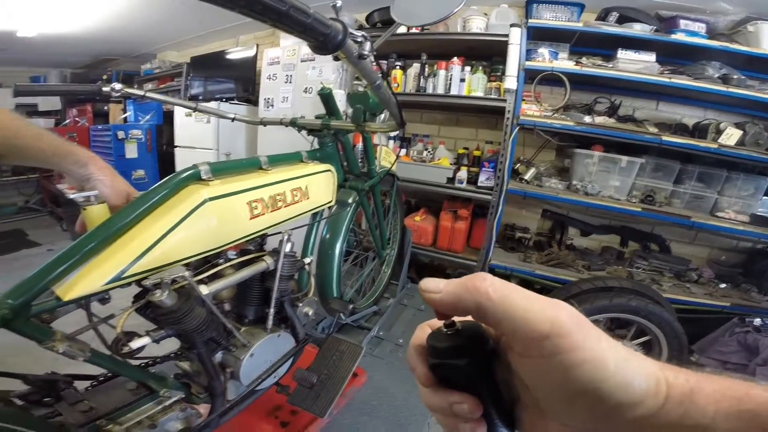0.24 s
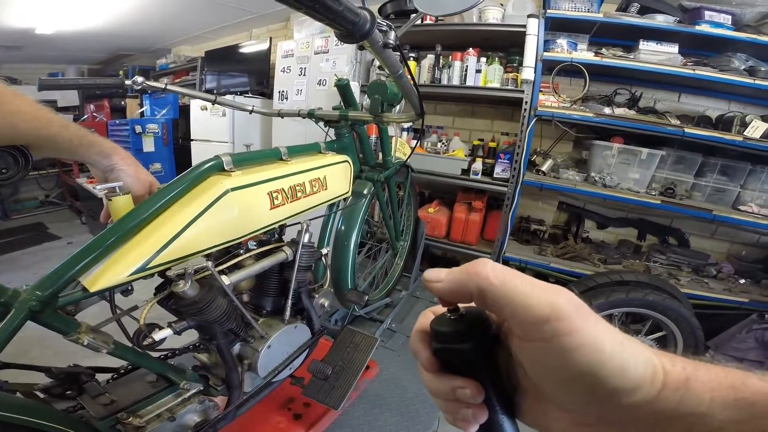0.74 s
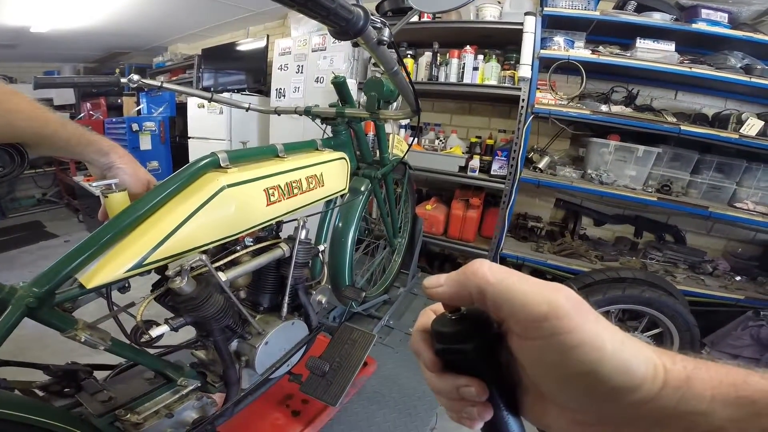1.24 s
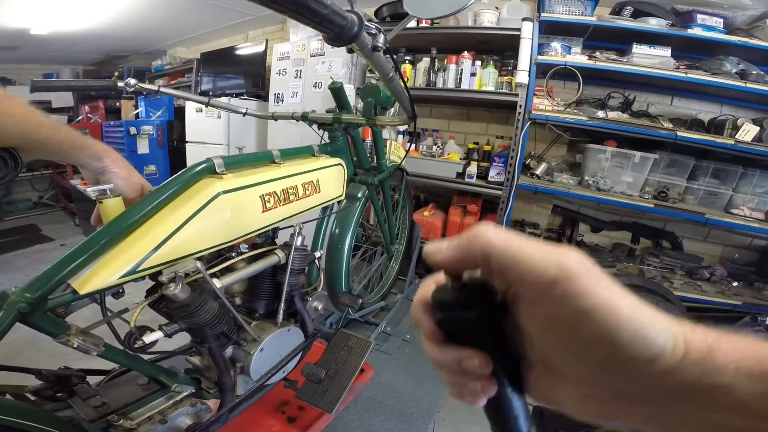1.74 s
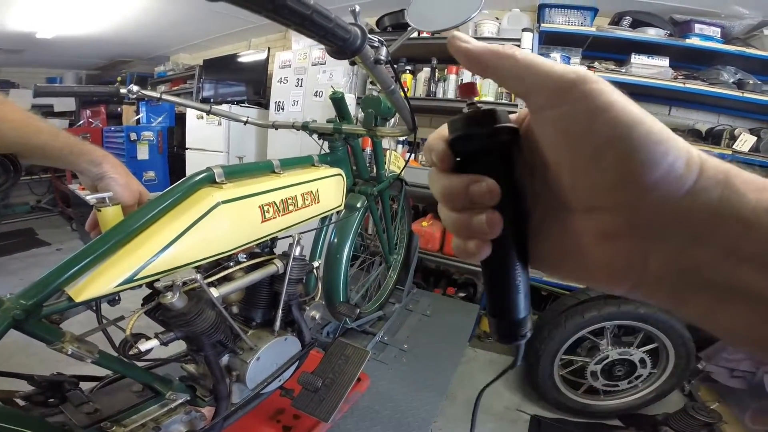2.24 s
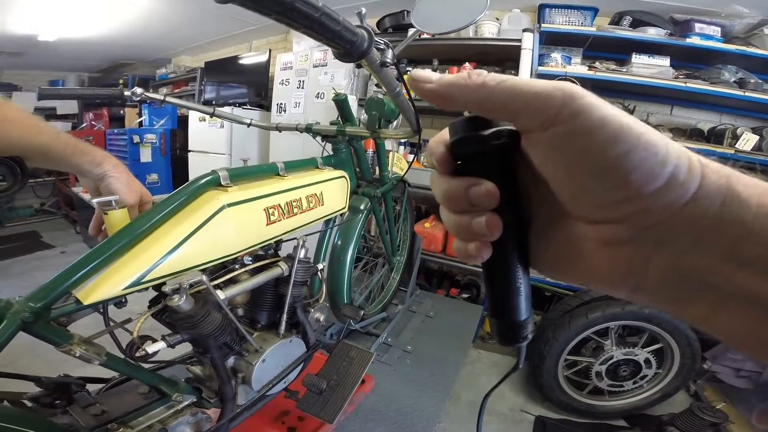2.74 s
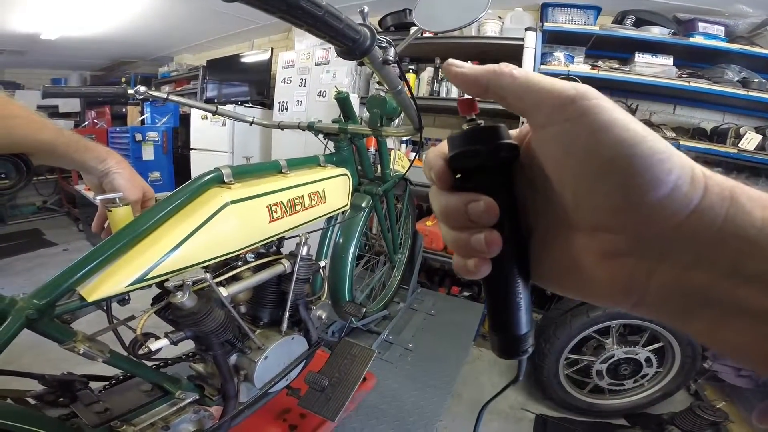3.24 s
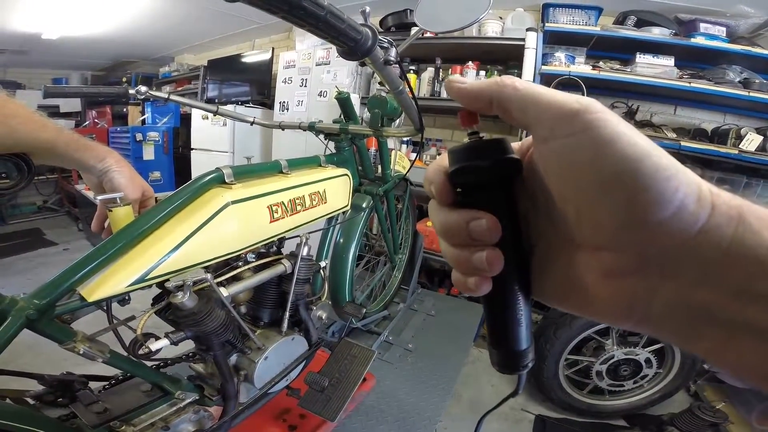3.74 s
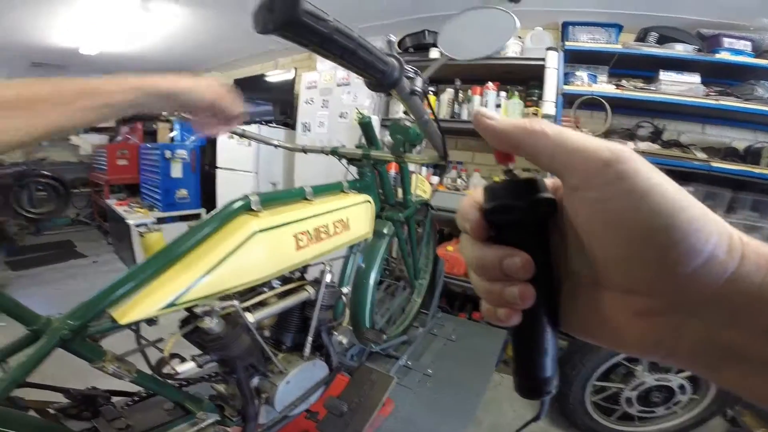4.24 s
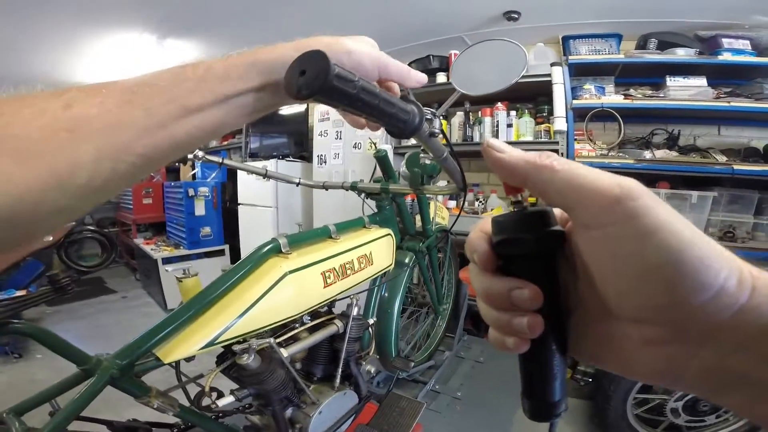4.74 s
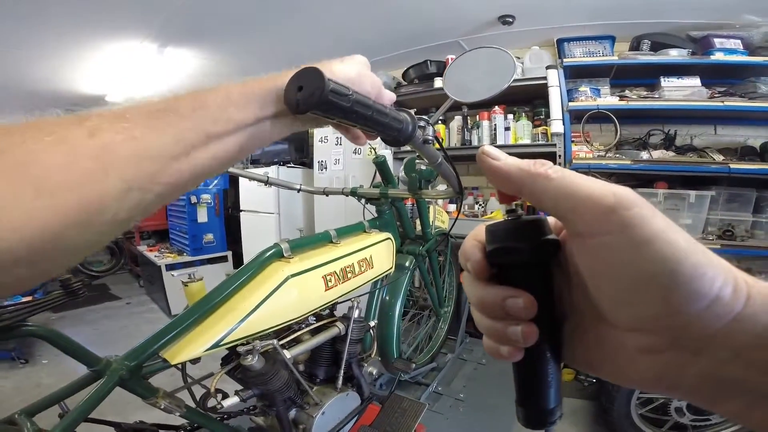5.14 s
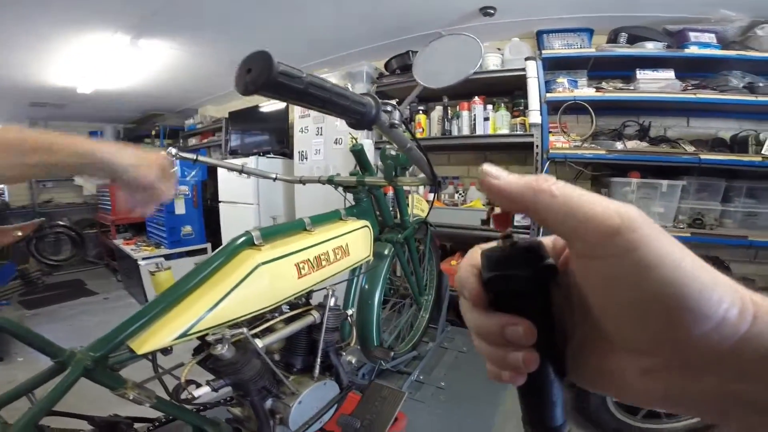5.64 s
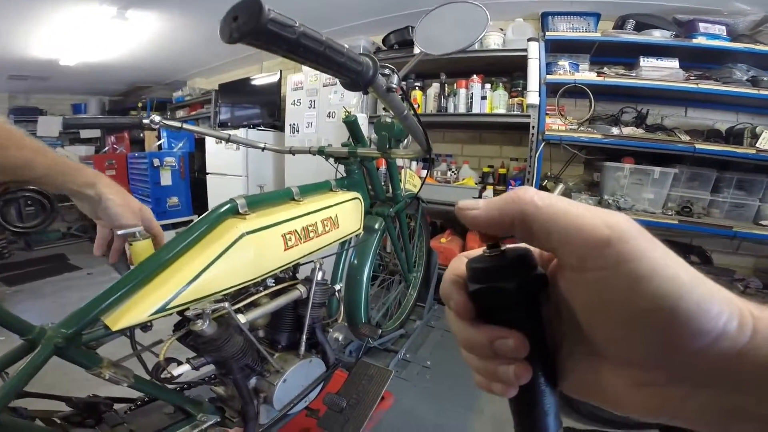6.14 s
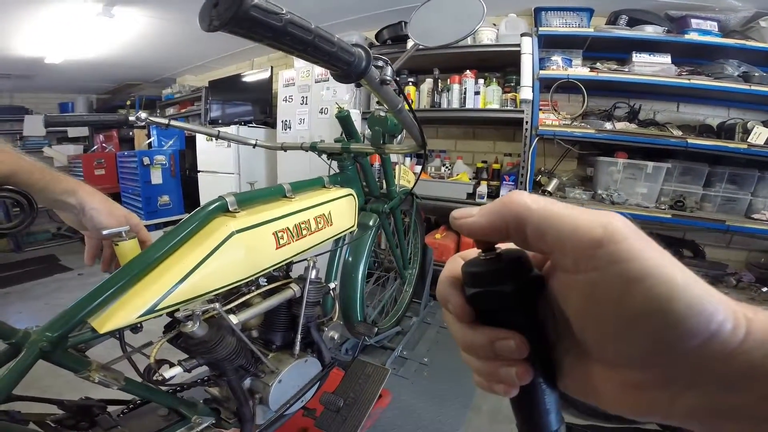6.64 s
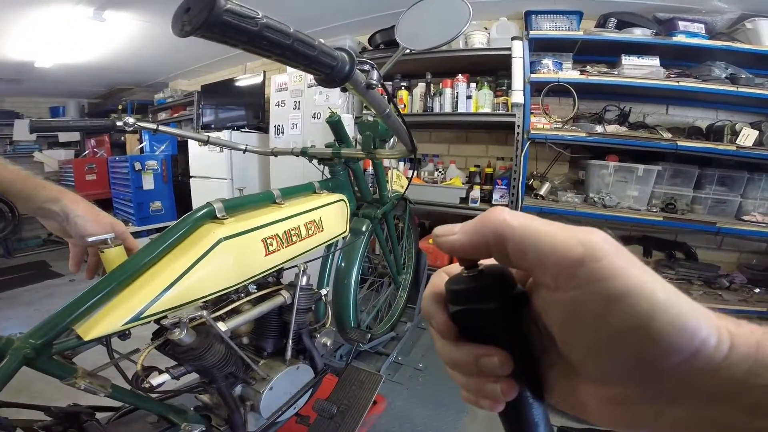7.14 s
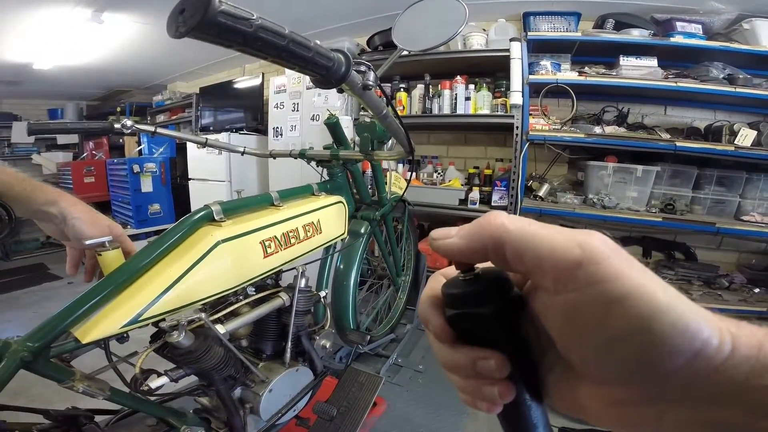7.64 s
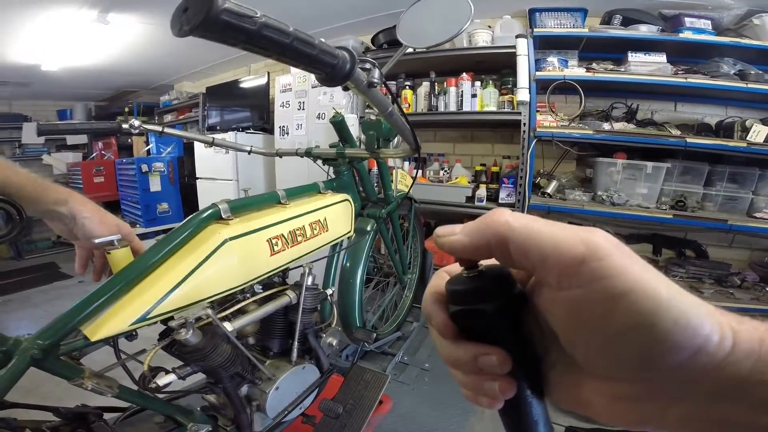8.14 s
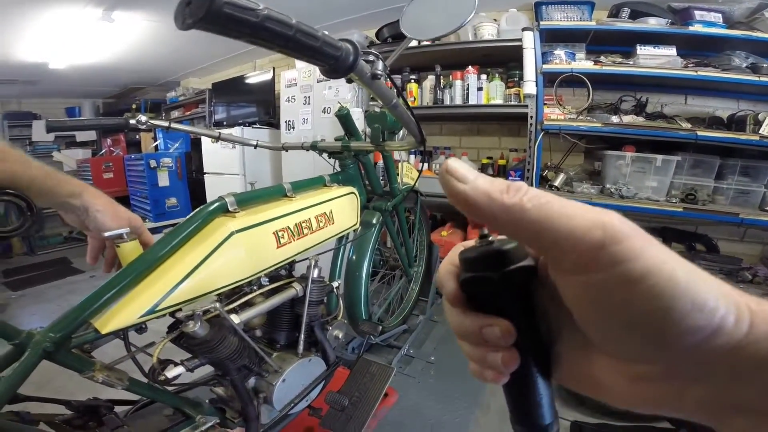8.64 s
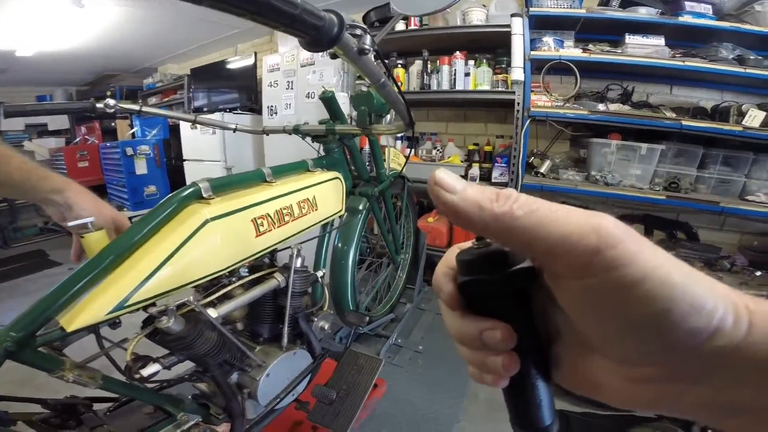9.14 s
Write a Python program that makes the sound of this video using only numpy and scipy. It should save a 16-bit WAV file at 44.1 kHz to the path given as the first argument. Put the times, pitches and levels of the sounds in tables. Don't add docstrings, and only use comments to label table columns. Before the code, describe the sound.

In a small cluttered workshop, the tail of a gear grind dies away. After a pause, an electric starter spins up harshly, soon thumping and clacking an old engine over. It lets go with rattles and a falling whine. Soft hand brushes and tiny ticks follow, then a second longer burst and another run-down. Close microphone, short room echo.

```python
import sys
import numpy as np
from scipy import signal
from scipy.fft import rfft, irfft
from scipy.io import wavfile
from scipy.ndimage import uniform_filter1d

SR = 44100
rng = np.random.default_rng(int(sys.argv[2]) if len(sys.argv) > 2 else 0)


def attenuation_scalar(level_db):
    decades = np.asarray(level_db, float) / 20
    return 10 ** decades


def wrap_up_sound(samples):
    columns = np.atleast_2d(samples).T
    tamed = np.clip(columns, -1, 1)
    steps = np.round(tamed * 32767).astype(np.int16)
    wavfile.write(sys.argv[1], SR, steps)


N = 414981
TIME = np.arange(N) / SR

# (frequency [Hz], density [dB per Hz])
HOUSING = [(290, -35.5), (500, -7.5), (529, -16), (1100, -13.5), (1590, -8.5), (2000, -10), (2480, -3),
           (2700, -8.5), (2990, -3), (4270, -10.5), (5140, -6), (6190, -1.5), (8240, -10), (13000, -19),
           (15200, -24.5)]
# (frequency [Hz], width [Hz], level over the housing colour [dB])
IDLE_RINGS = [(1610, 280, 14.5), (2470, 180, 2.5), (3475, 69, -6), (4070, 30, 16.5), (5124, 50, 11),
              (6100, 50.8, -13), (7260, 160, -10), (9510, 57, 4.5)]
SINGING = (1, 2, 3, 4, 5, 6)


def level(x, db):
    return x * attenuation_scalar(db) / np.sqrt(np.mean(x ** 2))


def play(tables, edge=.012):
    s, *columns = np.transpose(np.concatenate(tables))
    gate = 0
    for t in tables:
        start, end = t[0][0], t[-1][0]
        gate = gate + np.interp(TIME, [start - edge, start, end, end + 4 * edge], [0, 1, 1, 0])
    return [np.interp(TIME, s, c) for c in columns], gate


def colour(x, points, rings=()):
    size = 1 << 14
    hz = np.fft.rfftfreq(size, 1 / SR) + 1
    point_hz, point_db = np.array(points)[:, 0], np.array(points)[:, 1]
    gain = attenuation_scalar(np.interp(np.log(hz), np.log(point_hz), point_db))
    gain = gain * (1 + sum(attenuation_scalar(db) / (1 + (2 * (hz - f) / w) ** 2) ** .5 for f, w, db in rings))
    cepstrum = irfft(np.log(gain + 1e-9))
    cepstrum[1:size // 2] *= 2
    cepstrum[size // 2 + 1:] = 0
    response = irfft(np.exp(rfft(cepstrum)))[:size // 2]
    return signal.fftconvolve(x, response)[:N]


def band(x, hz, width):
    return signal.lfilter(*signal.iirpeak(hz, hz / width, fs=SR), x)


def walk(rate):
    k = int(SR / rate)
    held = np.repeat(rng.standard_normal(N // k + 1), k)
    return 1.3 * uniform_filter1d(uniform_filter1d(held, k), k)[:N]


def panels(hz, table):
    scale = np.arange(SR // 2)
    gain = sum(attenuation_scalar(db) / (1 + (2 * (scale - f) / w) ** 2) for f, w, db in table)
    return np.interp(hz, scale, gain)


def add(out, s, burst):
    i = int(s * SR)
    out[i:i + len(burst)] += burst[:N - i]


def hush():
    # (frequency [Hz], density [dB per Hz])
    room = [(12, -34), (20, -6.5), (64, -9), (195, -14.5), (224, -16), (369, -18.5), (560, -21), (719, -22),
            (1000, -25), (1180, -24.5), (8750, -41.5), (11500, -44.5), (15200, -44.5)]
    return level(colour(rng.standard_normal(N), room) * attenuation_scalar(walk(3.2)), -56)


def handling():
    # (start [s], end [s])
    grip = (3.9, 5.4)
    # (middle [s], length [s], level [dB], upper band over lower [dB])
    brushes = [(4.034, .06, -69.5, 4), (4.177, 0.095, -60.5, 3.5), (4.397, 0.14, -66.5, 1.5),
               (4.55, .08, -65, 0), (4.703, 0.12, -65.5, -1), (4.892, 0.055, -71, 4), (5.023, .08, -72, 3),
               (5.284, .04, -72, -5), (5.527, 0.11, -61.5, 1.5), (5.7, .06, -69, -1),
               (6.1, .06, -69.5, 3.5)]
    # (time [s], peak [dB], pitch [Hz])
    ticks = [
        (3.868, -47.5, 2210),
        (4.012, -52, 1340),
        (4.172, -40, 2380),
        (4.4094, -49, 2190),
        (4.4907, -47, 2550),
        (4.5691, -47, 1535),
        (4.8988, -49, 2530),
        (5.285, -50, 1640),
        (5.5511, -47, 1530),
    ]
    grain = attenuation_scalar(2.8 * walk(120) - 1.0)
    low, high, rumble = (level(band(band(rng.standard_normal(N) * grain, f, w), f, w), 0)
                         for f, w in [(1530, 500), (2450, 620), (110, 240)])
    held = play([[(s,) for s in grip]])[1]
    out = held * attenuation_scalar(-64 + 2.5 * walk(14)) * rumble
    for s, length, db, upper_db in brushes:
        out = out + attenuation_scalar(db) * np.exp(-((TIME - s) / length) ** 2) * (low + attenuation_scalar(upper_db) * high)
    t = TIME[:SR // 20]
    for s, db, hz in ticks:
        contact = rng.standard_normal(len(t)) * t * np.exp(-t / 0.0017)
        tick = band(band(contact, hz, 600), hz, 800)
        add(out, s, attenuation_scalar(db + 1.5) * tick / np.abs(tick).max())
    return out


def thump(t):
    pipe_hz = 163.6 * (1 + .03 * rng.standard_normal())
    turns = pipe_hz * (t + 0.0046 * (1 - np.exp(-t / 0.0021)))
    swell = (t / .005) * np.exp(1 - t / .005) + .1 * np.exp(-t / .025)
    step = np.gradient(np.exp(-((t - .007) / 0.0024) ** 2)) * SR * .005
    return np.sin(2 * np.pi * turns) * swell + .3 * step


def clack(t, treble_db, hz):
    age = t * 1e3 / 3.82 - 1.9
    scrape = rng.standard_normal(len(t)) * np.where(age < 0, np.exp(-age ** 2 * 0.55), np.exp(-.8 * age))
    ringing = colour(scrape, HOUSING, [(f, 2.5 * w, g - 6) for f, w, g in IDLE_RINGS])[:len(t)]
    body = band(band(ringing, 2200, 2800), 2400, 4000)
    dull = 0.89 * body + 1.3 * band(ringing, hz, 220)
    sound = dull + attenuation_scalar(treble_db + 5) * (ringing - body) + 0.023 * band(scrape, 500, 500)
    return sound / np.abs(dull).max()


def engine():
    # (time [s], thump level [dB])
    thumps = [(1.498, -35), (1.627, -29), (1.731, -26.5), (1.849, -26), (1.943, -24.5), (2.06, -25.5),
              (2.153, -23.5), (2.273, -25), (2.361, -25), (2.496, -29.5), (2.616, -30), (2.75, -50),
              (7.53, -42.5), (7.656, -29), (7.755, -26.5), (7.877, -30), (7.977, -26.5), (8.098, -27.5),
              (8.194, -27.5), (8.307, -28), (8.398, -25.5), (8.513, -26.5), (8.601, -25), (8.721, -26.5),
              (8.828, -24), (8.98, -31), (9.128, -33)]
    # (time [s], peak [dB], treble [dB], loudest ring [Hz])
    clacks = [(0.9188, -24.5, -2, 2820), (1.8609, -11.5, -13, 2820), (2.0674, -12, -11, 2900),
              (2.1584, -10, -14, 2920), (2.2782, -12, -2, 2550), (2.368, -10, -6.5, 1673),
              (2.5048, -15, -4.5, 1760), (2.5619, -23.5, -34.5, 2450), (2.6215, -11.5, -5, 2450),
              (2.7486, -18.5, -27, 1600), (2.8335, -30.5, -7, 2470), (2.8689, -21.5, -14.5, 1680),
              (2.9247, -38, -13, 1650), (2.9733, -25, -28, 1590), (6.209, -25, -9, 2550),
              (8.4066, -14, -12.5, 2976), (8.5214, -12.5, -1, 2963), (8.611, -7.5, -5.5, 2370),
              (8.7322, -11, -7.5, 3050), (8.8115, -20, -11, 2410), (8.8363, -9, -3.5, 1585),
              (8.9882, -17, -4.5, 1613), (9.1315, -19, 1.5, 2340), (9.2878, -20, -50, 1740)]
    out, t = np.zeros(N), TIME[:SR // 5]
    for s, db in thumps:
        add(out, s + 0.0023, attenuation_scalar(db) * thump(t))
    for s, db, treble_db, hz in clacks:
        add(out, s - .004, attenuation_scalar(db) * clack(t, treble_db, hz))
    return signal.sosfilt(signal.butter(2, 40, "high", fs=SR, output="sos"), out)


def drone():
    # (frequency [Hz], width [Hz], level [dB])
    modes = [(161.5, 12, 3), (299.4, 290, -7)]
    return level(sum(attenuation_scalar(db) * band(band(rng.standard_normal(N), f, w), f, 2 * w) for f, w, db in modes), 0)


def rattling(knocks_per_s=400, knock_db=4.0):
    knocks = (rng.random(N) < knocks_per_s / SR) * attenuation_scalar(knock_db * rng.exponential(size=N))
    loose = rng.standard_normal(N) * (1 + 0.2 * signal.lfilter([1], [1, -.99], knocks))
    ring = colour(loose, HOUSING, IDLE_RINGS)
    dull = signal.sosfiltfilt(signal.butter(2, 3000, fs=SR, output="sos"), ring)
    return level(dull, 0), level(ring - dull, 0)


def spinning_down(bright):
    # (heard from [s], stands still [s], brush hiss [dB])
    spins = [
        (2.72, 3.985, -61),
        (9.2, 10.28, -62),
    ]
    partials = (7, 4, 1)
    # (frequency [Hz], width [Hz], level [dB])
    casing = [(2330, 260, -5), (2920, 380, 1), (3470, 120, -5), (4000, 250, -11), (5250, 300, -6),
              (6900, 500, -6), (8000, 1200, -7), (9800, 2200, -8)]
    hz, brush = 0, 0
    for start, stop, db in spins:
        hz = hz + 3750 * np.clip(stop - TIME, 0, None) * (TIME > start)
        fade_in = np.clip((TIME - start) / 0.13, 0, 1)
        brush = brush + attenuation_scalar(db) * fade_in * np.clip(stop - TIME, 0, 1) ** 0.44
    turns = np.cumsum(hz * (1 + 0.0119 * walk(180))) / SR
    whine = 0
    for k, db in enumerate(partials):
        phase = 2 * np.pi * (k + 1) * turns + 0.82 * k * walk(500)
        whine = whine + panels((k + 1) * hz, casing) * attenuation_scalar(db + 4.3 * walk(45)) * np.sin(phase)
    return brush * (bright + np.sqrt(2) * whine)


def coasting():
    # (time [s], rattle level [dB])
    coast = [
        [(2.3, -30.5), (2.39, -42), (2.6, -40), (2.78, -45), (3.02, -58.5), (3.6, -66), (3.95, -73)],
        [(8.66, -39), (8.76, -39), (8.88, -44.5), (9.12, -40), (9.27, -49), (9.41, -56.5)],
    ]
    (db,), gate = play(coast)
    dull, bright = rattling()
    rattle = attenuation_scalar(db) * (dull + attenuation_scalar(-6.5) * bright)
    hum = attenuation_scalar(-45 + 0.77 * (db + 36)) * drone()
    return gate * (rattle + hum) + spinning_down(bright)


def teeth(hz, wander=.0025, flutter_db=3.2, wear=.4, blur=.1, fall_db=.45, teeth_per_turn=10):
    turns = np.cumsum(hz * (1 + wander * walk(40))) / SR
    throb = rng.random((16, 2)) * 2 * np.pi
    strikes = 0
    for k, (start, late) in enumerate(throb, 1):
        size = attenuation_scalar(flutter_db * walk(60) - fall_db * k)
        size = size * (1 + wear * np.sin(2 * np.pi * turns / teeth_per_turn + late))
        size = size * (.4 if k in SINGING else 1)
        strikes = strikes + size * np.sin(2 * np.pi * k * turns + 0.25 * start + blur * k * walk(140))
    return strikes, turns


def tooth_tones(hz, turns, even_db, slow):
    strengths = (0, 0.5, -1, -3, 1.5, 1.5)
    # (frequency [Hz], width [Hz], level under the motor [dB])
    sheets = [(343, 128, -12.5), (500, 40, -24.5), (578.8, 19, -18.5), (948, 130, -18.5), (1158, 34, -18),
              (1317, 90, -8.5), (1590, 130, -6), (1750, 130, -20), (2348, 350, -10), (2550, 41, -11.5),
              (2815, 69, -11), (3100, 270, -13), (3476, 98, -3.5), (1900, 200, -19)]
    tones = 0
    for k, db in zip(SINGING, strengths):
        load_db = db + min(k / 3, 1) * even_db - 3.0 * (k - 1) * slow
        flutter_db = 1.3 * walk(12) + (2.2 + 0.35 * k) * walk(90)
        phase = 2 * np.pi * k * turns + 0.13 * k * walk(120)
        tones = tones + panels(k * hz, sheets) * attenuation_scalar(load_db + flutter_db) * np.sin(phase)
    return np.sqrt(2) * tones


def motor():
    # (time [s], tooth rate [Hz], level [dB], evenness of the tooth strikes [dB])
    drive = [
        [(0.0, 257, -21, -8), (0.15, 218.8, -30.5, 1.5), (0.34, 181.7, -52.5, 7), (0.45, 150, -72.5, -15)],
        [(0.905, 156.6, -61, -2), (0.935, 182.2, -26.5, 1), (1.03, 259.9, -12.5, 2.5), (1.16, 381, -13.5, -2),
         (1.31, 452.4, -13.5, 0.5), (1.57, 507.6, -14.5, -1), (1.73, 532, -15.5, 0.5), (1.87, 561.4, -16, -2),
         (2.22, 587.2, -16, -1.5)],
        [(6.18, 131.8, -54, 9), (6.24, 177.7, -18, -1.5), (6.38, 320, -13.5, 0), (6.56, 422.2, -14, 0.5),
         (6.82, 469.2, -14.5, 0.5), (7.1, 480.5, -15, 1), (7.6, 521.8, -15, -1.5), (8.03, 571, -16, -2.5),
         (8.58, 583.2, -16.5, -6.5)],
    ]
    # (time [s], tooth rate [Hz], level [dB], evenness [dB])
    release = (0.194, -8, -18, -14)
    # (frequency [Hz], width [Hz], level over the housing colour [dB])
    steel = [(934, 110, -0.5), (1107, 8.8, -7), (1330, 36, 6.5), (1583, 24, 14.5), (2340, 25, 1),
             (2530, 14.22, 15), (2820, 13, 13), (2920, 27, 8.5), (3472, 49, 12), (3910, 85, 6),
             (4620, 65, 6.5), (5144, 60, 9.5), (5280, 53, 6.5), (4860, 25, -12.5), (6020, 90, -1.5),
             (9200, 72, 5.5)]
    let_go = [t + [tuple(np.add(t[-1], release))] for t in drive]
    (hz, db, even_db), gate = play(let_go)
    strikes, turns = teeth(hz)
    struck = colour(strikes, HOUSING, steel)
    noise = rng.standard_normal(N) * attenuation_scalar(1.2 * walk(30))
    chatter = level(colour(noise, HOUSING, [(f, w, g + 2.5) for f, w, g in steel]), 0)
    hiss = level(colour(noise, HOUSING, [(f, w, g - 3.5) for f, w, g in steel]), 0)
    slow = np.clip((470 - hz) / 150, .2, 1)
    share = attenuation_scalar(3 + even_db - 9 * slow)
    gears = share * struck / np.std(struck[gate > .5]) + slow * chatter + (1 - slow) * hiss
    gears = attenuation_scalar(-1.5) * gears / np.sqrt(1 + share ** 2)
    tones = tooth_tones(hz, turns, even_db, slow)
    hum = attenuation_scalar(-.4 * (db + 10.5)) * (attenuation_scalar(-42.5) + attenuation_scalar(-19) / (1 + (hz / 320) ** 12))
    frame = attenuation_scalar(-33 + 11.0 * slow) * level(band(band(noise, 360, 140), 330, 260), 0)
    return gate * attenuation_scalar(db + 0.78 * walk(15)) * (gears + tones + hum * drone() + frame)


def shop(x):
    t60_s, damping = 0.4, 0.46
    t = TIME[:SR // 2]
    noise = rng.standard_normal(len(t))
    dull = signal.lfilter([.15], [1, -.85], noise)
    tail = dull * attenuation_scalar(-60 * t / t60_s) + (noise - dull) * attenuation_scalar(-60 * t / (t60_s * (1 - damping)))
    tail = tail * np.clip((t - .004) / 0.0064, 0, 1)
    return signal.fftconvolve(x, tail / np.sqrt(np.sum(tail ** 2)))[:N]


def scene():
    near = handling() + engine() + coasting() + motor()
    return (attenuation_scalar(-1.57) * near + attenuation_scalar(-9.5) * shop(near) + hush())[None]


def low_pass(x):
    return signal.sosfilt(signal.butter(12, 15390, fs=SR, output="sos"), x)


def record(dry):
    # (frequency [Hz], level [dB])
    whistles = [
        (11719, -77),
        (14626, -85),
    ]
    whistle = sum(np.sqrt(2) * attenuation_scalar(db) * np.sin(2 * np.pi * hz * TIME) for hz, db in whistles)
    rounded = np.tanh(1.19 * dry) / 1.056
    sound = signal.sosfilt(signal.ellip(8, .2, 60, 15050, fs=SR, output="sos"), rounded)
    return low_pass(sound + whistle)


dry = scene()
out = record(dry)
wrap_up_sound(out)
```